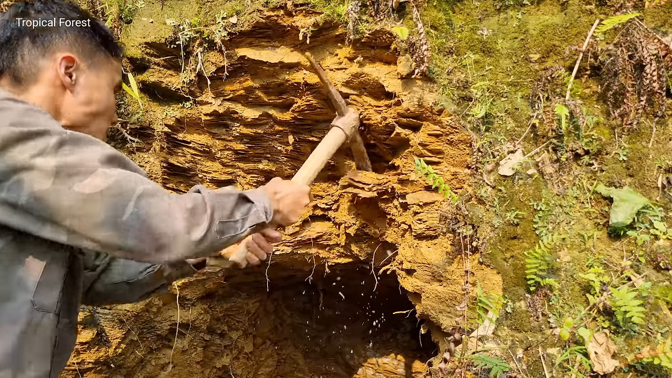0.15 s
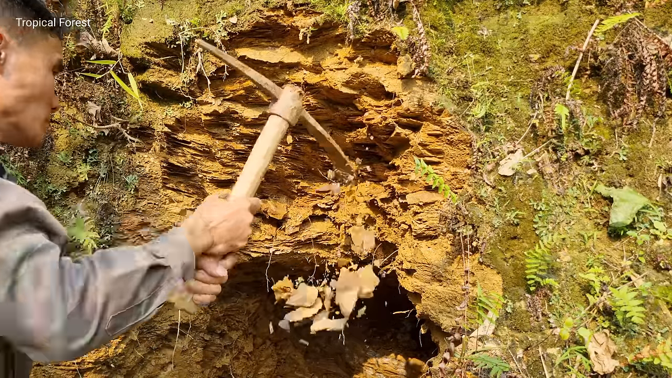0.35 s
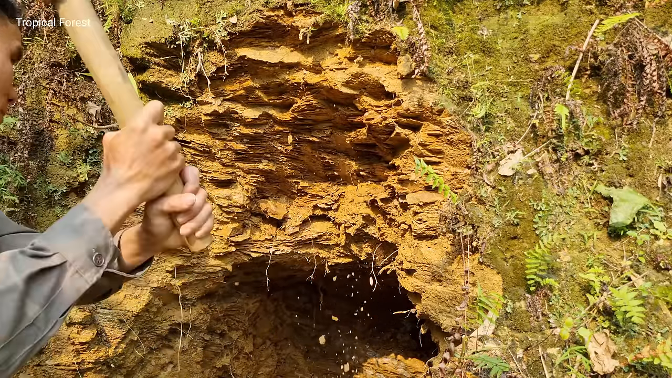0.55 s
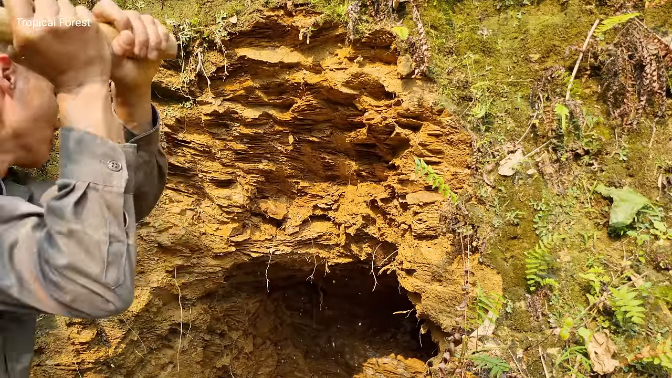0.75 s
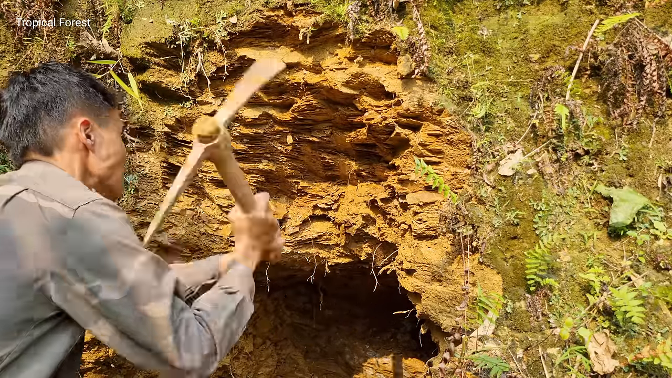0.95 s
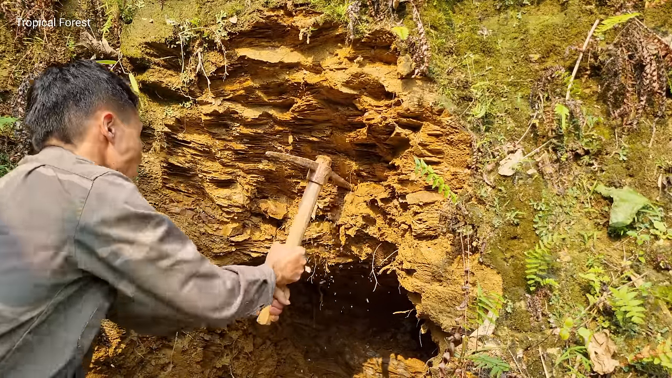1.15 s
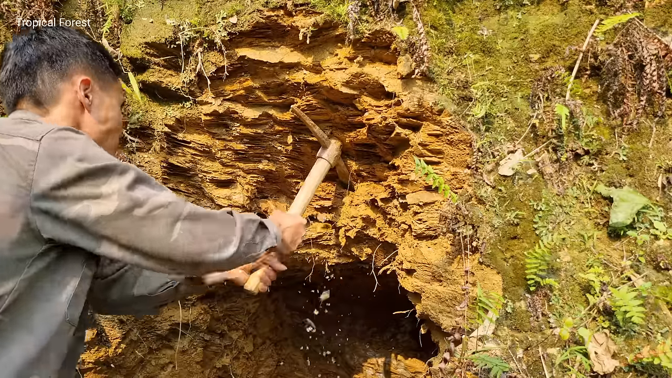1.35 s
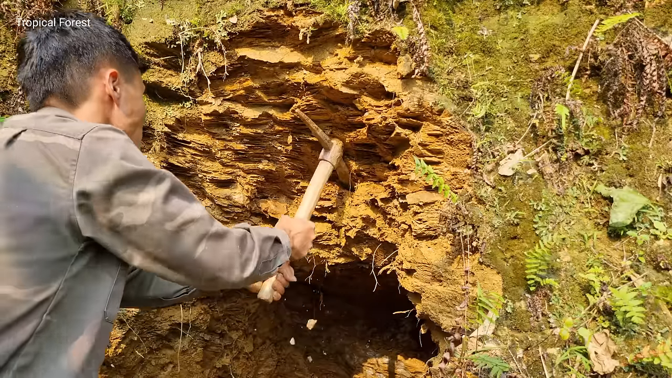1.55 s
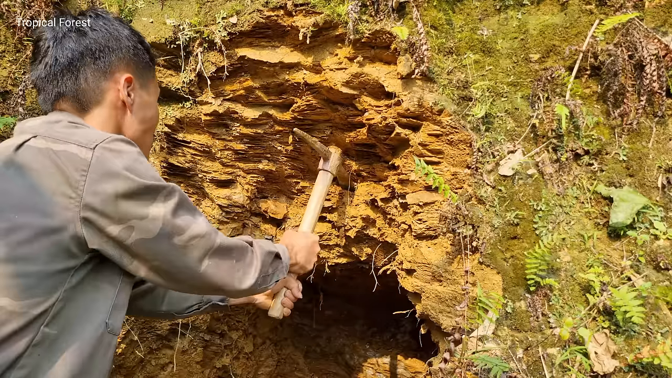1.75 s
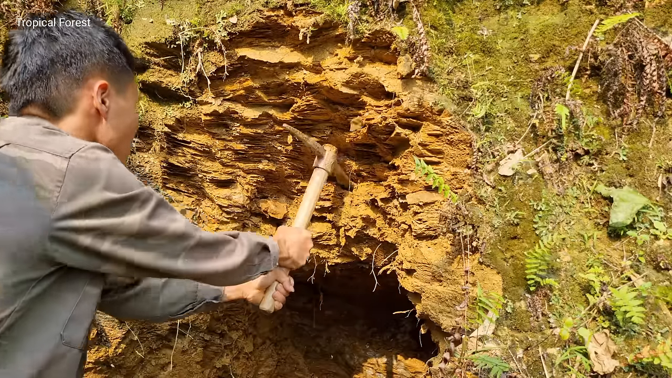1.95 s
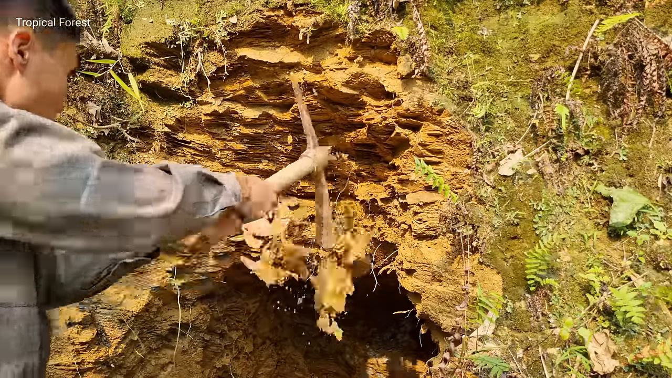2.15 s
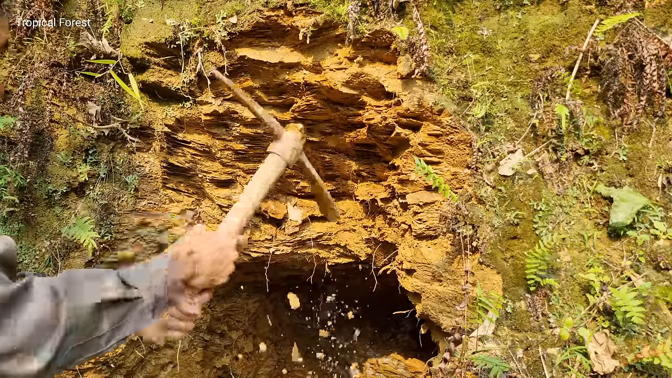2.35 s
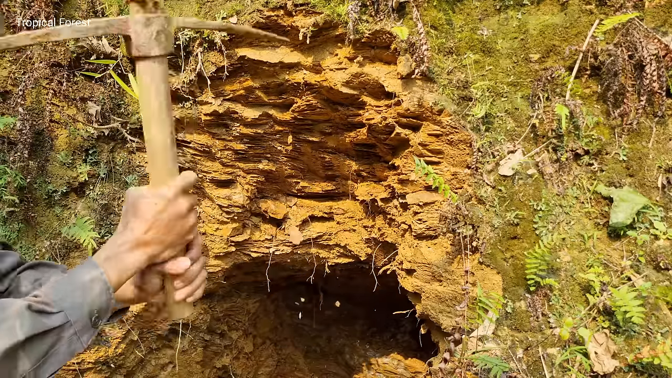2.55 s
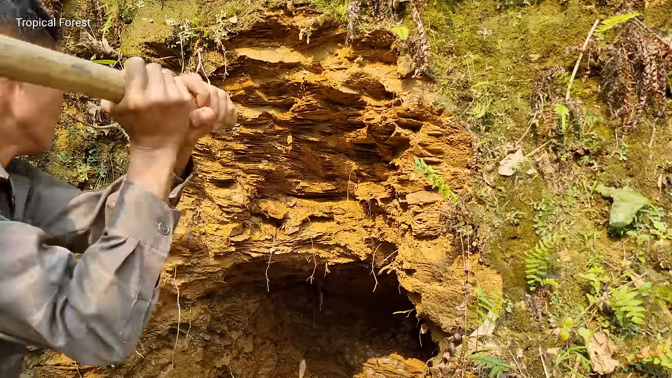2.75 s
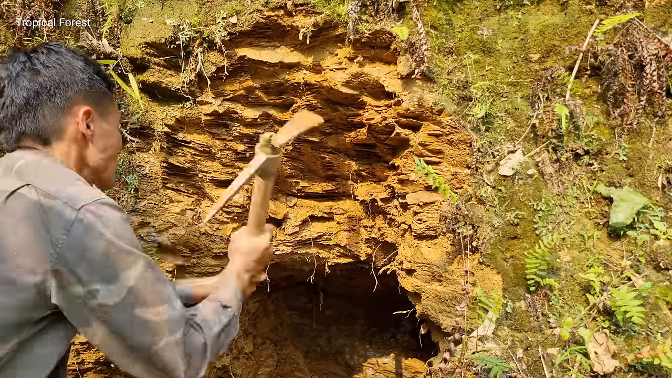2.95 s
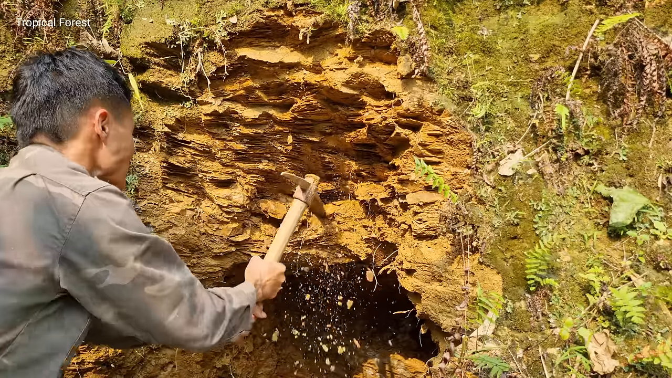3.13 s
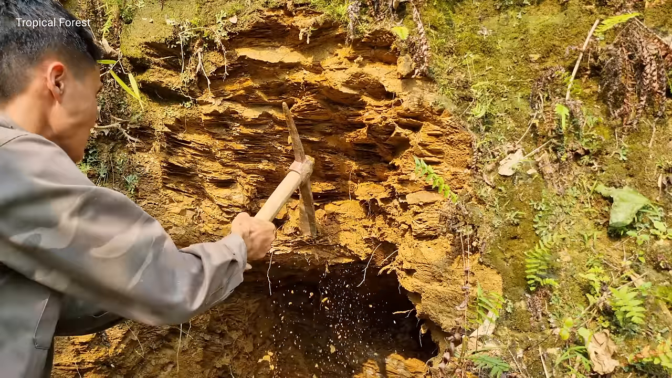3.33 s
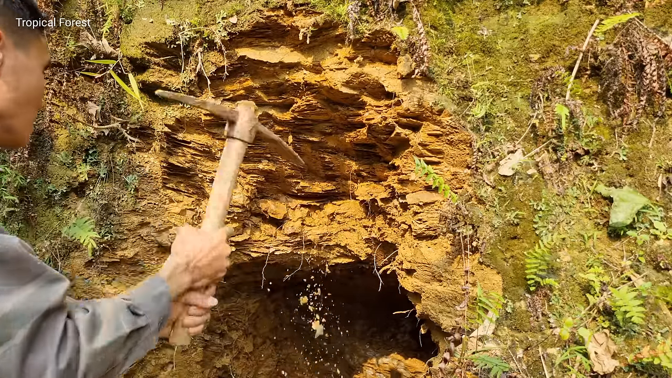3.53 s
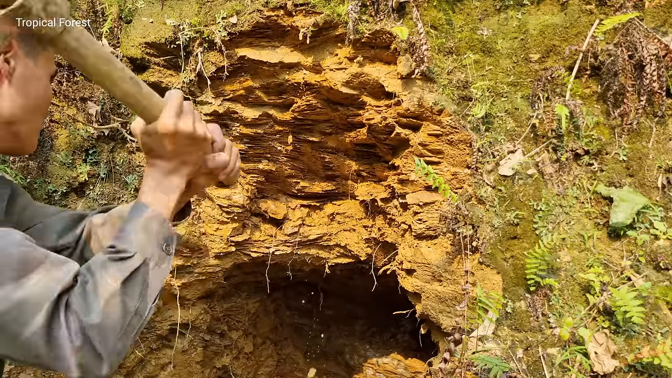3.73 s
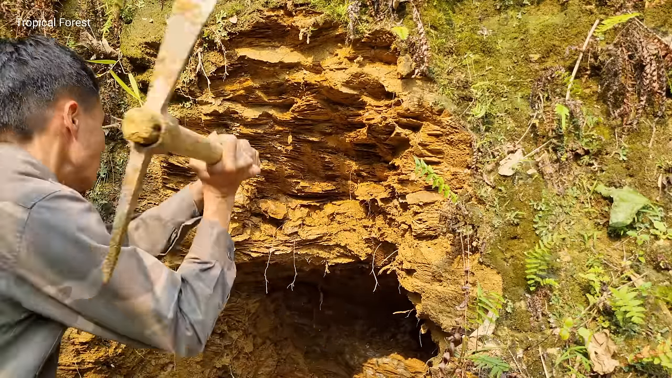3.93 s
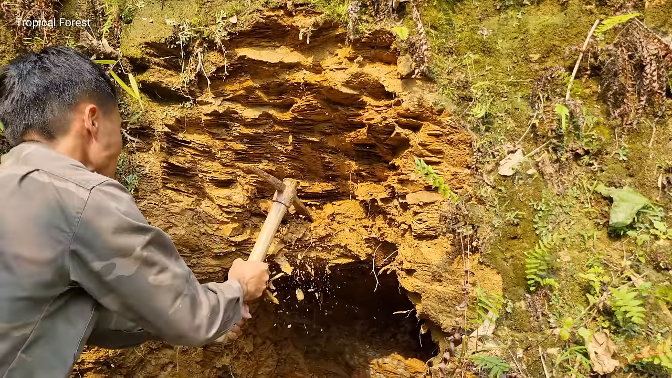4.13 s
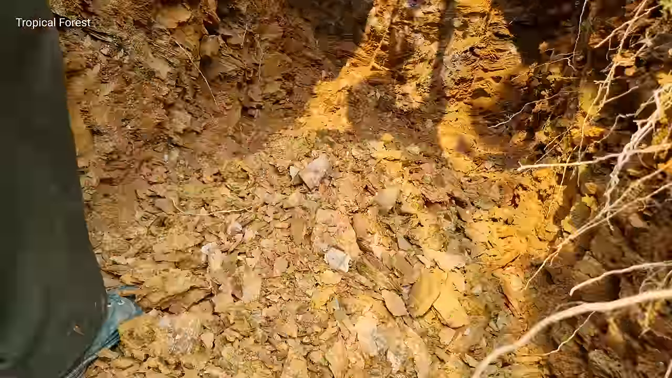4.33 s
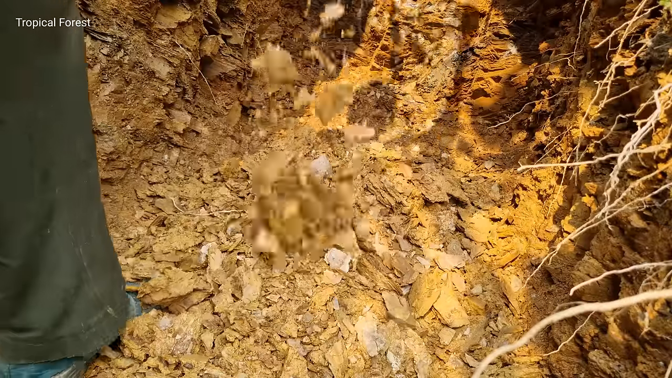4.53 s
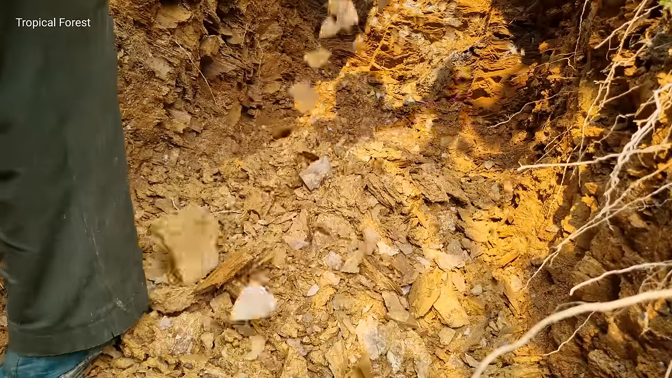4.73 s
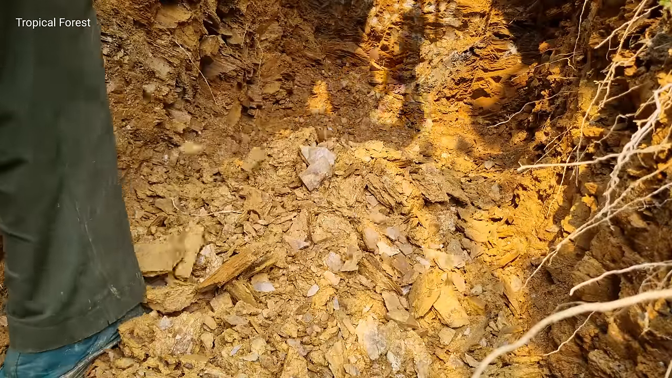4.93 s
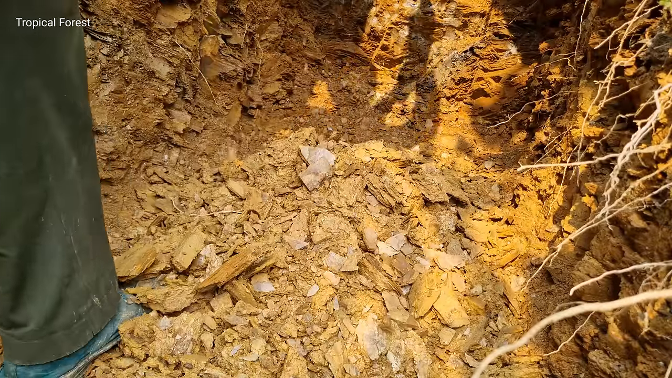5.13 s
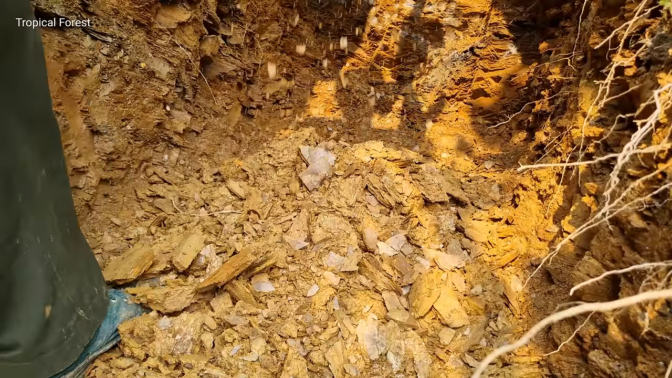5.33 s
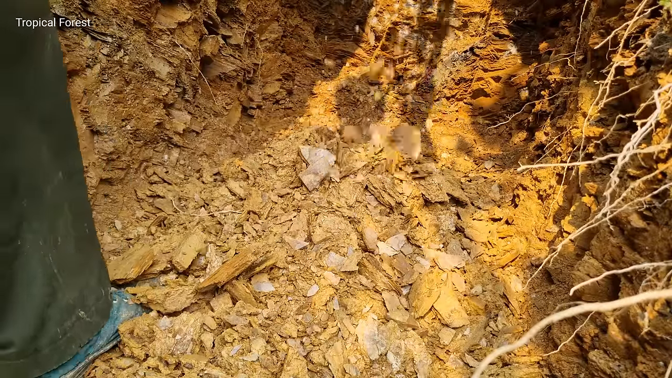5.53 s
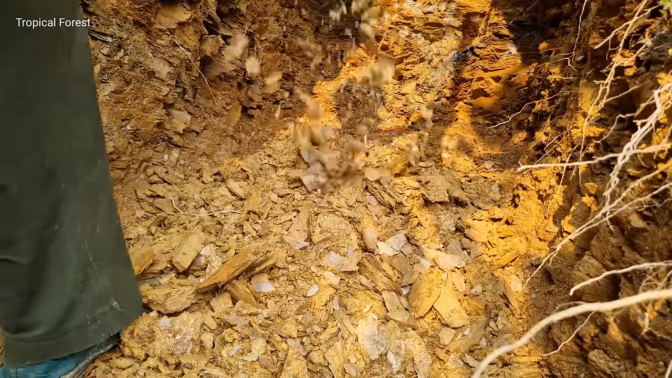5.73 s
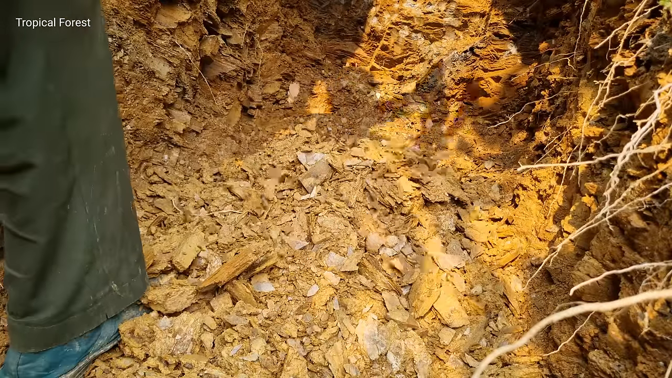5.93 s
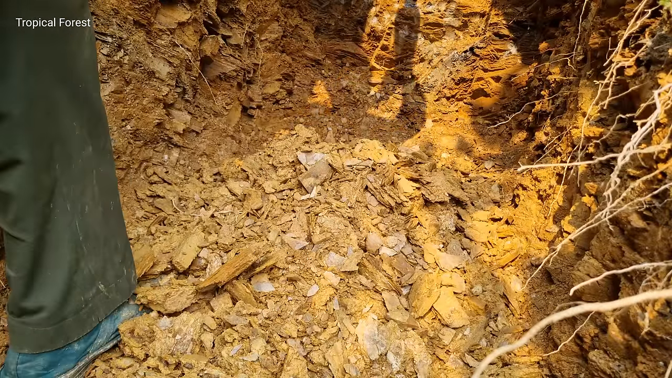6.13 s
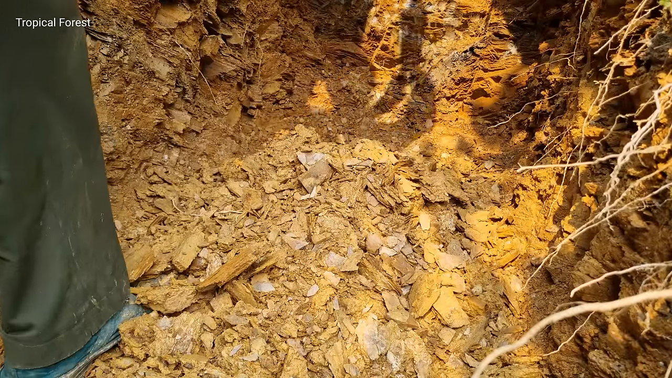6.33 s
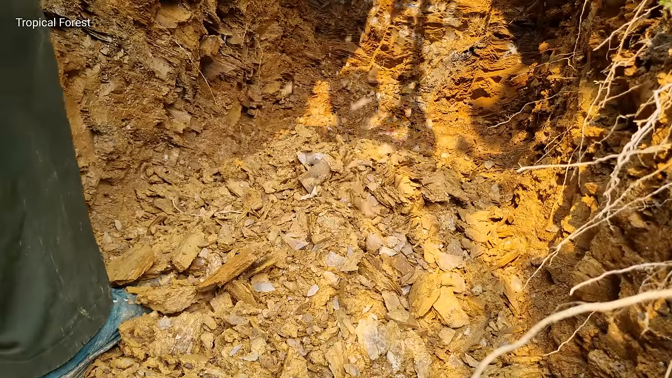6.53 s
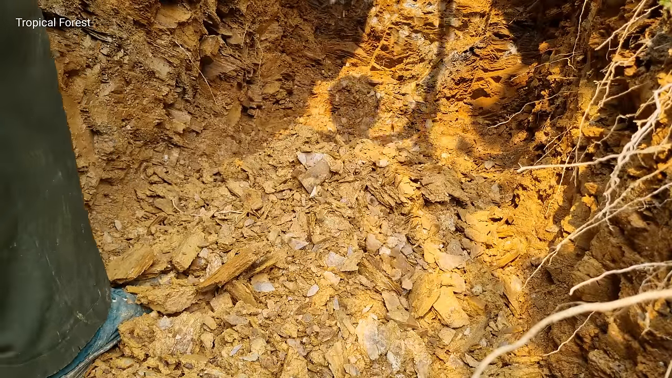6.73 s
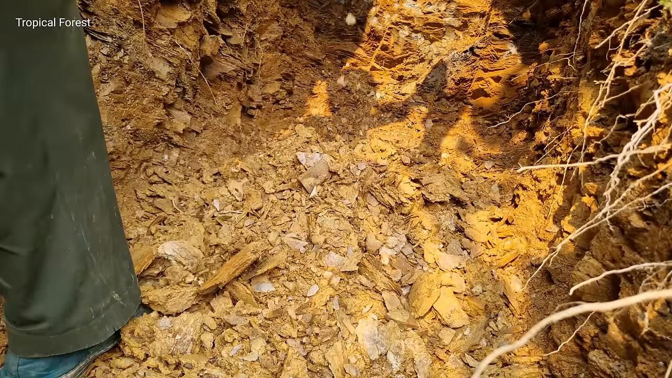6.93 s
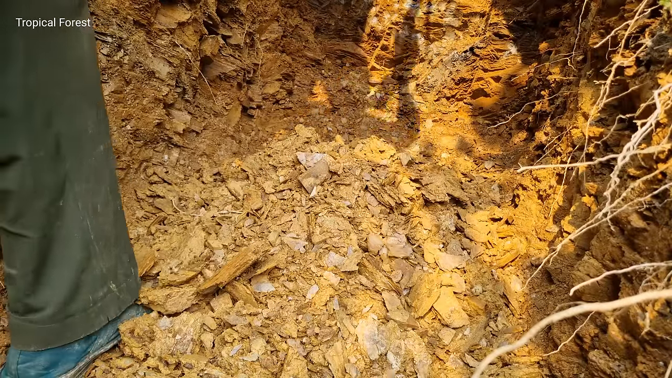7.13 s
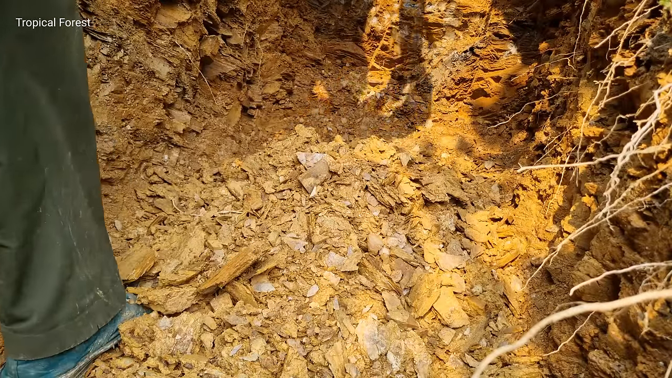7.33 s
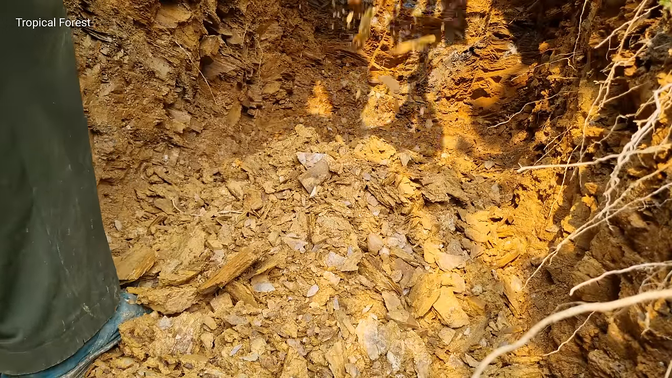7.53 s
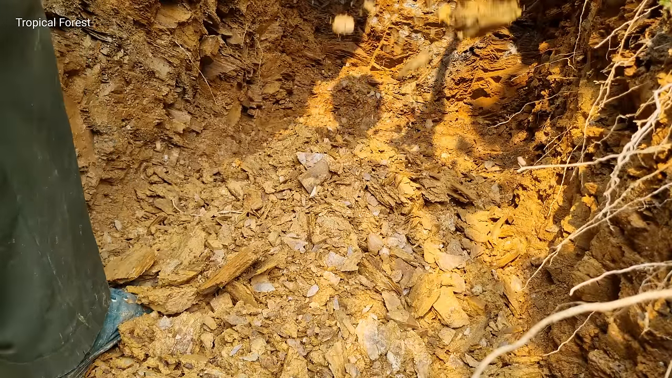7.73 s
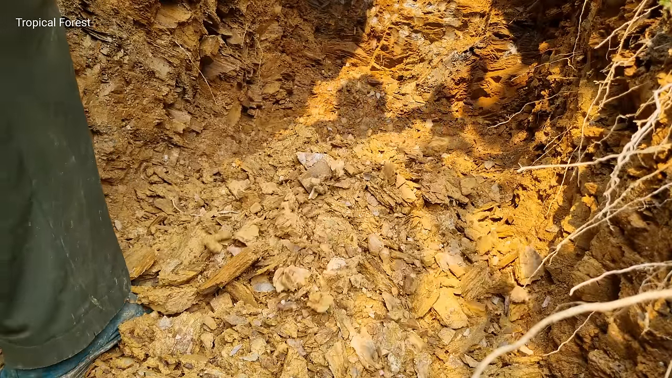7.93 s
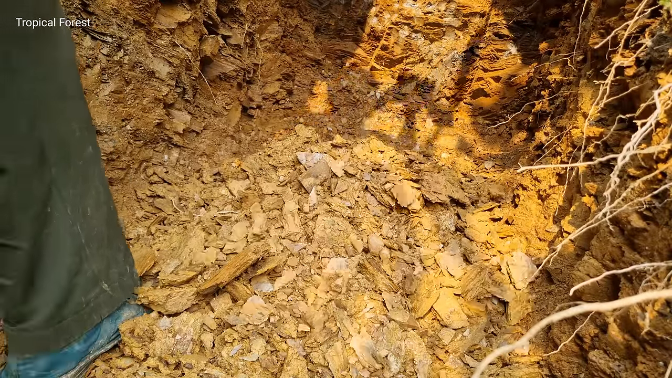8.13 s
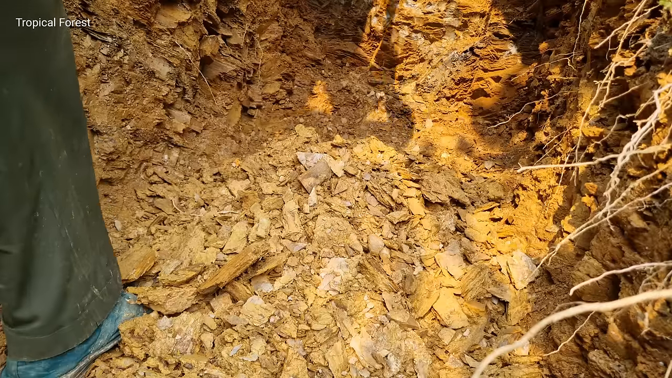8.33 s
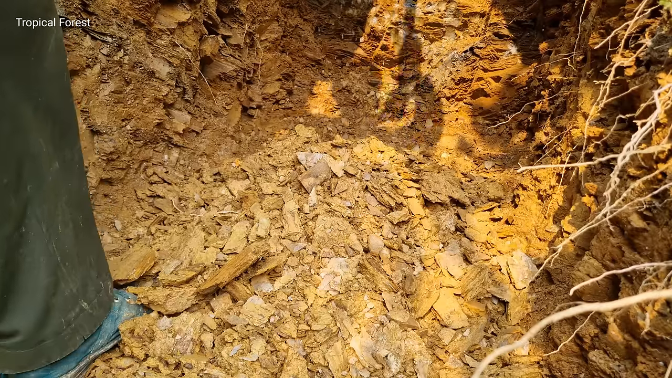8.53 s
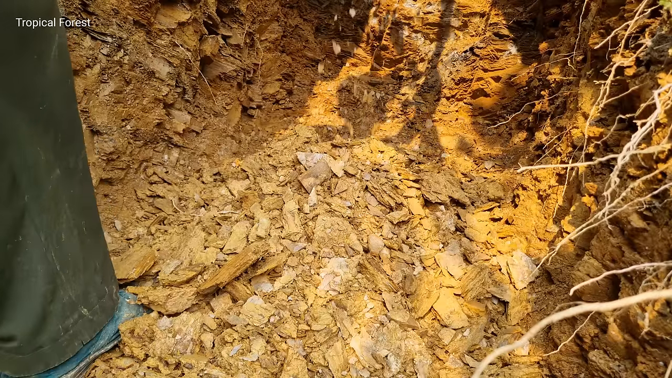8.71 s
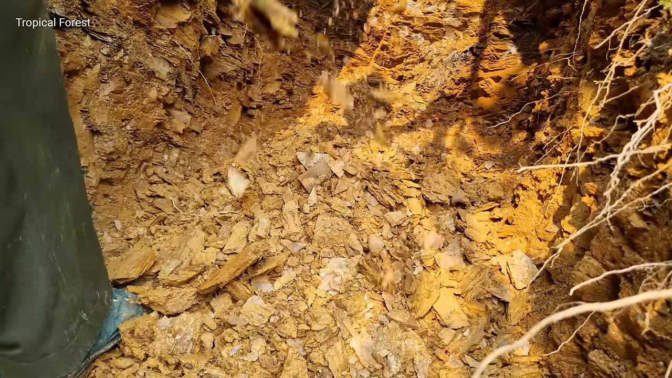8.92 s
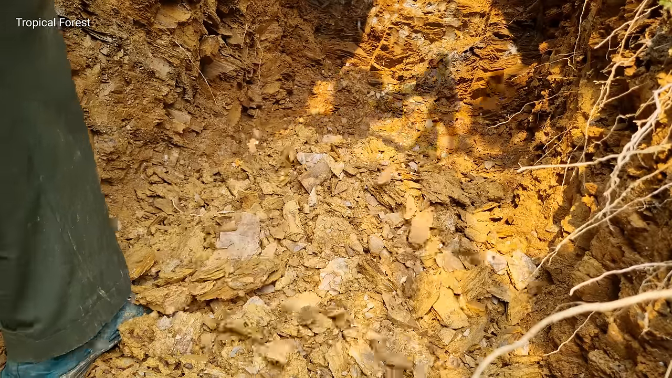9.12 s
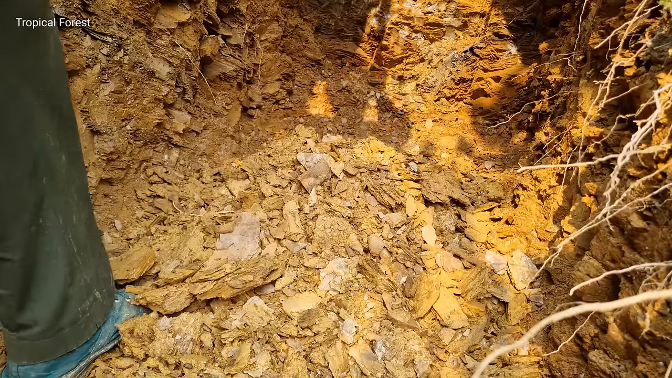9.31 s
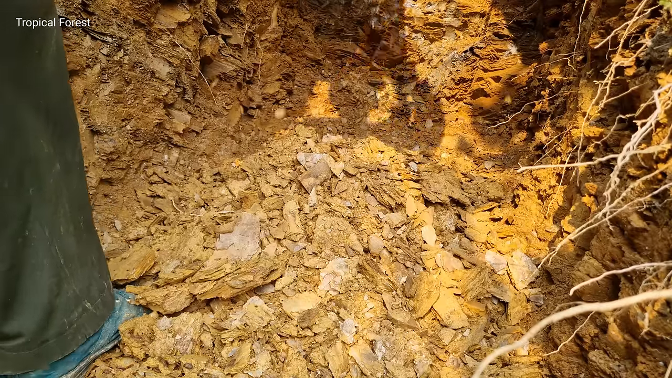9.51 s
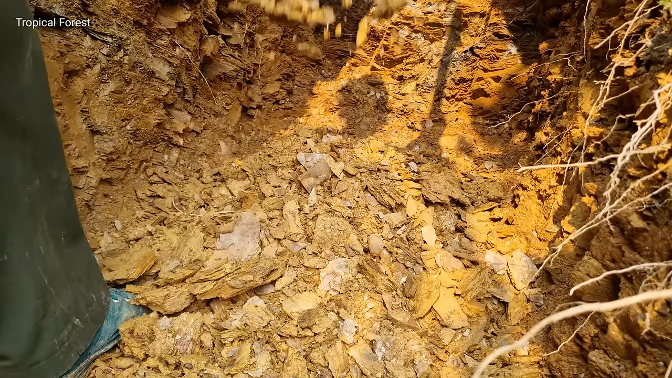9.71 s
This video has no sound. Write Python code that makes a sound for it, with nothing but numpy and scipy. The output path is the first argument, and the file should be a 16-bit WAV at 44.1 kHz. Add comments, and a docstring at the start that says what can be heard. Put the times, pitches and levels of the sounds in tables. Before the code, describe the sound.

Close outdoor stereo sound of digging into layered, crumbly rock, dry and without noticeable echo. At first grit trickles, a small lump drops and the steel pick head sings faintly; at 0.75 a short rush of rubble lands. A crunching blow at 1.1 has a low ground boom. From 1.3 to 2.3 the wedged tool is levered: stone grinds, wood creaks, steel rings thinly and sharp clicks snap around 2.1. Heavy lumps thud down at 2.6. Blows at 3.1 and 4.1 follow, with a faint pry at 3.3 and a big spill of rubble at 4.6. Then strikes come about every 1.1 seconds, at 5.0, 6.2, 7.25, 8.3 and 9.35, some preceded by a tiny scrape. Between them flakes tick, grit showers and stones thump, notably at 5.5 to 5.9, 7.0, 7.9 and 9.1. Grit thins out at the end. Very quiet distant insect hiss and low rumble underneath.

```python
"""Grit trickles and a first small burst of rubble slides while a steel pick head sings faintly against rock.
Then a pickaxe bites into a bank of layered, crumbly rock and is pried loose; flakes and grit pour into the pit.
Rock is shaped noise, grains and short resonances; steel and wooden handle are resonances driven by slipping stone.
Heavy impacts shake the ground, which answers late with a low boom. Insects hiss far off over a low rumble.
A handheld stereo microphone stands close by; its two ports hear the bass more alike than the treble."""
import sys
import numpy as np
from scipy import signal
from scipy.fft import rfft, irfft, next_fast_len
from scipy.io import wavfile
from scipy.ndimage import map_coordinates

SR = 44100
rng = np.random.default_rng(int(sys.argv[2]) if len(sys.argv) > 2 else 0)


def master_out(mix):
    """Clip the mix to full scale and print it as 16-bit PCM to the path in sys.argv[1]."""
    frames = np.transpose(np.atleast_2d(mix))
    ceiling = np.clip(frames, -1, 1)
    pcm = np.round(ceiling * 32767).astype(np.int16)
    wavfile.write(sys.argv[1], SR, pcm)


N = 435266


def amp(db):
    """Decibels to gain."""
    return 10 ** (np.asarray(db) / 20)


def unit(x):
    """Scaled to rms 1."""
    return x / np.sqrt(np.mean(x ** 2) + 1e-20)


def along(points, hz):
    """(Hz, value) points read on a log axis."""
    f, v = np.transpose(points)
    return np.interp(np.log(hz + 1), np.log(f + 1), v)


def filtered(x, response):
    """x times a complex response of frequency, zero-padded so that tails do not wrap onto the start."""
    n = x.shape[-1]
    m = next_fast_len(n + 8192)
    return irfft(rfft(x, m) * response(np.fft.rfftfreq(m, 1 / SR)), m)[..., :n]


def add(track, s, sound):
    """Mix a sound into a track at time s."""
    part = track[..., round(s * SR):][..., :sound.shape[-1]]
    part += sound[..., :part.shape[-1]]


def wobble(rate):
    """A smooth random curve, rate knots a second."""
    knots = rng.standard_normal(int(N * rate / SR) + 4)
    return map_coordinates(knots, [np.arange(N) * rate / SR])


def patter(per_s, spread_db):
    """Sparse impulses of very unequal size and either sign."""
    size = amp(spread_db * np.minimum(rng.exponential(size=N), 3))
    return (rng.random(N) < per_s / SR) * size * rng.standard_normal(N)


def ringer(x, hz, cycles):
    """x through one resonance that dies by 60 dB in the given number of cycles."""
    r = amp(-60 * hz / (cycles * SR))
    return signal.lfilter([1, 0, -1], [1, -2 * r * np.cos(2 * np.pi * hz / SR), r * r], x)


def resonances(modes):
    """Causal response of a set of (Hz, width Hz, dB) modes, alternating in sign."""
    def response(f):
        total = 0
        for k, (centre, width, db) in enumerate(modes):
            band = 1j * f * width / (centre * centre - f * f + 1j * f * width)
            total = total + (-1) ** k * amp(db) * band
        return total
    return response


# likeness of the two microphone ports: (f/Hz, correlation)
PORT_LIKENESS = [(100, 0.62), (500, .8), (1500, 0.3), (5000, 0.05), (12000, 0.075)]


def port_angle(hz):
    """Phase angle whose cosine is the likeness of the two ports."""
    return np.arccos(np.clip(along(PORT_LIKENESS, hz), -1, 1))


def hiss(spectrum, size):
    """Stereo noise of rms 1: much alike at both ports in the bass, nearly unrelated in the treble."""
    def shared_and_opposed(hz):
        turn = port_angle(hz) / 2
        return amp(along(spectrum, hz)) * [np.cos(turn), np.sin(turn)]
    mid, side = filtered(rng.standard_normal((2, size)), shared_and_opposed)
    return unit(np.array([mid + side, mid - side]))


def grains(spectrum, low_hz, high_hz, per_s, spread_db, cycles, count):
    """Pieces of many sizes, each size with its own pitch and place, knocking at random; rms 1."""
    out = np.zeros((2, N))
    for hz in np.geomspace(low_hz, high_hz, count) * amp(rng.normal(0, 0.7, count)):
        piece = unit(ringer(patter(per_s / count, spread_db), hz, cycles))
        piece = piece * amp(along(spectrum, hz)) * np.sqrt(hz)
        lag_s = port_angle(hz) / (2 * np.pi * hz)  # between the ports
        out += [piece, np.roll(piece, round(rng.choice([-1, 1]) * lag_s * SR))]
    return unit(out)


# quiet background: a low rumble, with far insects hissing near 3, 5 and 8 kHz: (f/Hz, level/dB per Hz)
BACKGROUND_SPECTRUM = [(18, -33), (30, -4.5), (58, 4), (118, -21), (273, -11.5), (364, -20.5),
                       (1540, -37.5), (2750, -4), (3770, -11.5), (4780, -7), (6720, -18), (8300, -4),
                       (9220, -25.5), (14800, -15), (16000, -33)]


def quiet_background():
    """A low rumble and the hiss of far insects as one shaped noise, gently wavering in level."""
    level_db = -65.5 + 0.68 * wobble(2.9)
    return amp(level_db) * hiss(BACKGROUND_SPECTRUM, N)


# grit that keeps trickling between the bursts: (t/s, grit level/dB, stones over grit level/dB)
TRICKLING = [(0, -60.5, 1), (.15, -68, -26), (.7, -69.5, -9), (1.05, -66, -1.5), (1.6, -62, -5.5),
             (1.95, -64.5, 15.5), (2.35, -78, -13.5), (2.75, -68, 2.5), (3.4, -61, -5.5), (3.9, -77, 4.5),
             (4.4, -73, 11), (5.0, -50.5, -4), (5.77, -62, -0.5), (6.05, -53, -3.5), (6.92, -81, 6.5),
             (7.24, -56, -3.5), (7.55, -86.5, -20), (8.05, -59, -7.5), (8.35, -69.5, -9.5),
             (9.87, -63.5, 5)]
# bursts of rubble sliding or landing, and of stone grinding under the levered pick:
# (t/s at full flow, build-up/dB per s, held t/s, decay/dB per s, grit level/dB, stones over grit level/dB)
BURSTS = [(0.199, 398, 0.071, 307, -51.5, -2.5), (0.756, 900, 0.048, 301, -36, -4),
          (1.378, 897, 0.04, 404, -56.5, 10.5), (1.85, 897, 0.11, 900, -53.5, 14.5),
          (2.044, 516, 0.018, 299, -47.5, -20.5), (2.114, 502, 0.006, 389.5, -37, 8),
          (2.555, 2494, 0.025, 270, -44, 11), (2.624, 263, 0.068, 429, -40.5, 1.5),
          (3.26, 702, 0.052, 302, -53, 4), (3.335, 302, 0.0076, 337, -41, -17.5),
          (3.559, 200, 0.048, 143, -65, -18), (4.42, 797, 0.0031, 119.5, -52, -22.5),
          (4.569, 1999, 0.0056, 353, -46, 2), (4.632, 803, 0.044, 204.5, -31.5, -8),
          (4.731, 300, 0.042, 330, -44.5, 4), (4.866, 900, 0.062, 247.5, -45, -2.5),
          (5.312, 1500, 0.013, 69, -54, -13), (5.416, 600, 0.0086, 292, -45, -18),
          (5.541, 1500, 0.025, 303.5, -38, -12.5), (5.601, 1000, 0.066, 195.5, -43, -4),
          (5.844, 908, 0.044, 202, -33.5, -13), (6.47, 180, 0.0036, 332, -50.5, -12),
          (6.523, 997.5, .01, 57.5, -52.5, -12.5), (6.627, 500, 0.0073, 92, -49.5, -11),
          (6.972, 509, 0.045, 388.5, -38.5, -11), (7.447, 609, 0.072, 361, -52.5, 2),
          (7.648, 1697, 0.0044, 355, -50.5, 0), (7.709, 300, 0.0049, 187, -42.5, -4.5),
          (7.921, 1505.5, 0.05, 318, -37, -4.5), (8.571, 64, .005, 119, -58.5, -9.5),
          (8.82, 204, 0.023, 165, -53.5, -12), (9, 799.5, 0.05, 303, -43.5, -4),
          (9.105, 508, 0.00344, 409, -27.5, -2), (9.568, 102, 0.0098, 162, -48, -7),
          (9.766, 361, .005, 57, -55, -12)]


def flow():
    """Gains of grit and stones: each burst builds up, holds and dies away over the trickle."""
    t = np.arange(N) / SR
    s, grit_db, over_db = np.transpose(TRICKLING)
    grit = amp(np.interp(t, s, grit_db))
    stones = amp(np.interp(t, s, grit_db + over_db))
    for start, builds, held, dies, db, over_db in BURSTS:
        first = max(round((start - .2) * SR), 0)
        u = t[first:first + SR] - start
        burst = amp(db + builds * np.minimum(u, 0) - dies * np.maximum(u - held, 0))
        add(grit, first / SR, burst)
        add(stones, first / SR, amp(over_db) * burst)
    return grit, stones


# fine grit: (f/Hz, level/dB per Hz)
GRIT_SPECTRUM = [(590, -41), (1000, -1.5), (1430, 0), (6110, -0.5), (7790, 1.5), (9170, -6.5),
                 (14900, -7.5), (16000, -23.5)]
# tumbling and grinding stones: (f/Hz, level/dB per Hz)
STONE_SPECTRUM = [(65, -29), (130, -3), (300, -7), (470, -10), (636, -6.5), (1010, -14.5), (2200, -20.5),
                  (2860, -46.5), (4840, -120)]


def rubble(fine, coarse):
    """Grit rains in clumps of tiny grains over a wash of dust, stones move in fewer, longer knocks."""
    hits = np.abs(patter(per_s=70, spread_db=2))
    clumps = unit(signal.lfilter([1], [1, -amp(-60 / (0.023 * SR))], hits))  # t60 of 23 ms
    dust = (0.59 + 0.38 * clumps) * hiss(GRIT_SPECTRUM, N)
    grit = dust + .5 * grains(GRIT_SPECTRUM, 1100, 11000, per_s=2000, spread_db=2.5, cycles=9, count=26)
    knocks = grains(STONE_SPECTRUM, 120, 1544, per_s=550, spread_db=4.5, cycles=21, count=20)
    stones = 0.4 * hiss(STONE_SPECTRUM, N) + 0.55 * knocks
    return fine * amp(2.7 * wobble(55)) * grit + coarse * amp(2.0 * wobble(30)) * stones


# waves in the ground after a pick blow: (f/Hz, level/dB, t60 t/s, delay t/s, rise t/s)
GROUND_WAVES = [(60.5, 1.5, 0.2, 0.014, 0.0041), (138, -6.5, 0.069, .009, 0.0057)]
SOIL_S = 0.17  # the soil swallows what is left of a boom about this late


def boom(damping=1, pitch=1, soft=1, upper_db=0):
    """The ground's answer: slow waves in the soil arrive late and swell before they die."""
    t = np.arange(SR // 3) / SR
    out = 0
    for k, (hz, db, t60, delay, rise) in enumerate(GROUND_WAVES):
        late = np.maximum(t - delay / soft, 0)
        decay = amp(db + k * upper_db + rng.normal(0, 1) - 60 * damping * late / t60)
        swell = 1 - np.exp(-late / (rise * soft))
        out = out + decay * swell * np.sin(2 * np.pi * pitch * hz * late)
    return out * amp(-20 * (t / SOIL_S) ** 4)


# the heaviest lumps of rock hitting the pit floor: (t/s, boom level/dB, knock level/dB)
LUMPS = [(0.0, -39, -48), (0.18, -40, -43.5), (0.751, -26.5, -39), (.79, -40, -24.5), (1.432, -49, -62),
         (2.114, -30, -41), (2.568, -19, -41), (2.601, -17.5, -24.5), (3.539, -45, -71), (4.64, -16, -31),
         (4.718, -29, -39), (4.772, -29, -35.5), (4.869, -26.5, -42), (5.204, -30.5, -34), (5.56, -33, -47),
         (5.659, -29.5, -35), (5.789, -32, -43.5), (5.851, -28, -44), (5.922, -31, -38), (6.682, -40, -52),
         (6.778, -42.5, -56), (6.996, -26.5, -34), (7.491, -36, -39), (7.706, -30.5, -43),
         (7.942, -17, -28), (8.064, -44, -57), (8.829, -32, -51), (9.019, -28.5, -56), (9.117, -28.5, -41)]
# a loose lump's boom dies faster than a blow's, varies more in pitch, arrives sooner and swells more slowly
LUMP_DAMPING, LUMP_SCATTER, LUMP_SOFT = 1.13, 0.074, 2  # factor, relative pitch spread, factor
LUMP_UPPER_DB = 5  # a lump stirs the upper wave of the ground more than a blow does
TUMBLE_DB, TUMBLES_PER_S = -7, 240  # smaller lumps shake the ground at random


def thuds(fine):
    """Heavy lumps shake the same ground as the blows and give a dull knock of their own."""
    out, t = np.zeros(N), np.arange(SR // 10) / SR
    for s, db, knock_db in LUMPS:
        burst = rng.standard_normal(len(t)) * amp(-60 * t / 0.12)
        knock = ringer(burst, 220 * amp(rng.normal(0, 2.7)), cycles=9.4)
        add(out, s, amp(knock_db) * knock / np.abs(knock).max())
        pitch = rng.normal(1, LUMP_SCATTER)
        add(out, s, amp(db) * boom(LUMP_DAMPING, pitch, LUMP_SOFT, LUMP_UPPER_DB))
    tumbles = fine * (rng.random(N) < TUMBLES_PER_S / SR) * rng.standard_normal(N)
    shaking = signal.fftconvolve(tumbles, boom(LUMP_DAMPING, soft=LUMP_SOFT))[:N]
    return out + amp(TUMBLE_DB) * shaking


# sharp clicks and short knocks: flakes, small stones, a tap of the pick: (t/s, level/dB, f/Hz)
CLICKS = [(0.72, -34.5, 5940), (0.752, -39.5, 1430), (0.794, -24.5, 3270), (0.829, -32.5, 2620),
          (0.954, -41, 5470), (1.314, -45, 5300), (1.587, -38, 4900), (1.74, -38, 6000), (1.848, -37, 2200),
          (1.944, -37, 1950), (1.965, -30.5, 3510), (2.039, -35, 3500), (2.097, -21, 5430),
          (2.115, -19, 2100), (2.129, -27, 2080), (2.145, -23, 3504), (2.245, -38, 2150),
          (2.534, -47.5, 890), (2.554, -28, 3040), (2.611, -26.5, 4240), (2.635, -33.5, 990),
          (2.655, -37, 1040), (2.669, -36, 1280), (2.69, -31, 3220), (2.776, -48, 1090),
          (3.058, -37.5, 4200), (3.26, -38, 1660), (3.299, -46.5, 4700), (3.342, -26, 4960),
          (3.464, -45, 7500), (3.873, -37.5, 4700), (3.9, -43.5, 3400), (4.317, -50, 900),
          (4.422, -37.5, 8140), (4.482, -38, 5400), (4.567, -30.5, 1620), (4.627, -33, 1500),
          (4.657, -23, 5995), (4.676, -25.5, 6100), (4.866, -40.5, 905), (4.9, -28.5, 6150),
          (4.924, -21, 4300), (4.953, -25, 4200), (5.022, -21, 2490), (5.262, -32.5, 4920),
          (5.311, -46, 1410), (5.45, -40, 3490), (5.477, -38.5, 5960), (5.542, -32, 4770),
          (5.568, -38.5, 1290), (5.599, -30.5, 5100), (5.657, -38, 3315), (5.782, -27.5, 3695),
          (5.829, -20.5, 4460), (5.861, -37, 1480), (5.933, -39, 1870), (6.351, -21.5, 3900),
          (6.525, -27.5, 7740), (6.629, -26.5, 6460), (6.988, -29, 4020), (7.707, -30, 3000),
          (7.921, -48, 700), (7.943, -35.5, 2830), (7.962, -30, 5360), (8.484, -44.5, 4700),
          (8.72, -44.5, 5130), (8.856, -36, 2900), (8.984, -41.5, 6820), (9.003, -27.5, 7140),
          (9.058, -23.5, 4930), (9.103, -15, 2900), (9.61, -29.5, 3960), (9.761, -40.5, 4660),
          (9.797, -34.5, 3770)]


def clicks_and_knocks():
    """Each is a hard click and a short tick of noise around its own pitch, then one weaker tick."""
    out, t = np.zeros((2, N)), np.arange(SR // 20) / SR
    late = np.maximum(t - .0004, 0)
    for s, db, hz in CLICKS:
        noise = hiss([(hz / 8, -26), (hz / 1.8, -5), (hz, 0), (hz * 2.2, -8), (hz * 6, -24)], len(t))
        decay = amp(-60 * t / 0.008) + amp(-11 - 60 * t / 0.045)
        tick = noise * decay * (1 - np.exp(-t / 0.0003))
        cycles = min(5 + (3600 / hz) ** 4, hz / 50)  # low knocks ring on; high ones only click
        click = 1.97 * amp(-60 * late * hz / cycles) * np.sin(2 * np.pi * hz * late)
        lean_db = rng.normal(0, 0.87) * np.array([[1], [-1]])  # to one port or the other
        add(out, s, amp(db + lean_db) * (tick + click))
        # the weaker tick has its ports swapped
        add(out, s + rng.uniform(0.0042, .014), amp(db - 11) * tick[::-1])
    return out


# resonances of the wooden handle: (f/Hz, width f/Hz, level/dB)
HANDLE_MODES = [(257, 78, -2.5), (634, 80, 2), (1070, 100, -6.5), (1790, 380, -11)]


def handle(grinding):
    """Stone slips against the wedged head in fits and the wood of the handle creaks in its own bands."""
    slips = unit(patter(per_s=1400, spread_db=3.5)) * amp(3.5 * wobble(40))
    creak = unit(filtered(slips, resonances(HANDLE_MODES)))
    return amp(1) * grinding * creak  # +1 dB


# resonances of the steel pick head when undamped: (f/Hz, width f/Hz, level/dB)
STEEL_MODES = [(1740, 50, 0.5), (2460, 13, -2.5), (3037, 24, -5.5), (3730, 22, -7.5), (4120, 50, -8),
               (5080, 92, -5), (6400, 13, -4.5), (7370, 27, -3.5), (7520, 79, -9), (9150, 11, -12.5),
               (10100, 25, -8)]
# the head is levered in the crack: (from t/s, to t/s, ring level/dB, damping by the rock as a factor on widths)
LEVERING = [(0.18, 0.494, 18, 2.2), (1.777, 2.302, 22.5, 2.5), (3.283, 3.379, 18.5, 2.3)]


def steel(rubbing):
    """The head slips against the rock in fits; as the contact wanders, its modes sound by turns."""
    out = np.zeros(N)
    for hz, width, level_db in STEEL_MODES:
        slips = rubbing * amp(3.5 * wobble(28)) * unit(patter(per_s=2500, spread_db=3))
        for start, end, db, damping in LEVERING:
            span = slice(round(start * SR), round(end * SR))
            drive = np.pad(slips[span], (0, SR // 4))  # room to ring out
            mode = (hz * rng.normal(1, 0.0096), width * damping, level_db)
            ring = filtered(drive, resonances([mode]))
            add(out, start, amp(db) * ring / np.sqrt(damping))
    return out


# rock crushed under the point: (f/Hz, level/dB per Hz)
CRUNCH_SPECTRUM = [(210, -14), (350, -7.5), (566, -7.5), (943, -9.5), (2070, -6), (2980, -11.5),
                   (4040, -12), (13600, -28), (16000, -37)]
# the point grazes the face just before it bites: (from t/s, to t/s, level/dB)
FACE_GRAZES = [(6.148, 6.172, -26.5), (7.244, 7.252, -31.5), (9.339, 9.347, -22.5)]


def grazes():
    """The point scrapes the face: crushing noise that swells towards the bite."""
    out = np.zeros((2, N))
    for start, end, db in FACE_GRAZES:
        size = round((end - start) * SR)
        onset = np.minimum(np.arange(size) / (0.0033 * SR), 1)
        swell = amp(np.linspace(-9, 3, size))
        add(out, start, amp(db) * onset * swell * hiss(CRUNCH_SPECTRUM, size))
    return out


# ringing layers of the rock face: (f/Hz, level/dB)
ROCK_LAYERS = [(205, -0.5), (270, -2.5), (410, -6), (765, -3.5), (1200, -0.5), (1740, 0.5), (2020, -4.5),
               (2950, -2.5)]
# pick blows close to the microphone: (t/s, crunch level/dB, boom level/dB, extra treble level/dB, crunch t60 t/s,
# ring level/dB, extra low knock level/dB, thick slab f/Hz, thin chip f/Hz)
PICK_BLOWS = [(1.121, -16, -10.5, 5, .063, -22, 6, 629, 1745),
              (3.107, -19, -13, 8.5, 0.1, -20.5, 5.5, 651, 1430),
              (4.137, -16, -13.5, 0, 0.12, -21, 3, 745, 2980),
              (5.0314, -12.5, -15.5, 3, .077, -18, -9, 405.7, 1966),
              (6.172, -12.5, -16.5, 4, 0.067, -20, 2.5, 481, 2212),
              (7.252, -11, -16, -2.5, 0.05, -24.5, -5, 495.5, 1112),
              (8.321, -16.5, -12, -1.5, .067, -22, -1.5, 563, 1827),
              (9.3499, -16.5, -11, 4, 0.054, -22.5, -0.5, 494, 1582)]
KNOCK_HZ = 324  # the low knock lies below
SLAB_DB, CHIP_DB, SCATTER_DB = 5, 9, 1.5  # slab and chip over the ring; chance per mode


def blows():
    """The point crushes rock in a burst of cracks; the struck layers ring briefly and the ground follows."""
    out, t = np.zeros((2, N)), np.arange(SR // 4) / SR
    for s, db, boom_db, bright_db, t60, ring_db, knock_db, slab_hz, chip_hz in PICK_BLOWS:
        tilt = lambda hz: amp(bright_db * np.clip(np.log2(hz / 2000 + 1e-3), 0, 1))
        crush = amp(-60 * t / t60) + amp(-29.5 - 60 * t / 0.32)  # pit walls and dust prolong the burst
        cracks = 1 + t / 0.0059 * np.exp(1 - t / 0.0007)  # the first fracture is the loudest
        onset = 1 - np.exp(-t / 0.00018)
        crunch = filtered(hiss(CRUNCH_SPECTRUM, len(t)), tilt)
        add(out, s, amp(db) * crush * cracks * onset * crunch)
        slab_db = SLAB_DB - knock_db / 2  # a blow that knocks less deep puts more into the slab
        for hz, level_db in ROCK_LAYERS + [(slab_hz, slab_db), (chip_hz, CHIP_DB)]:
            push_s = 0.0012 + 1.5 / hz  # low layers are driven longer and later than small chips
            push = rng.standard_normal(len(t)) * t / push_s * np.exp(-t / push_s)
            ring = ringer(push, hz, cycles=0.84 * np.sqrt(hz))
            low_knock_db = knock_db / (1 + (hz / KNOCK_HZ) ** 8)
            level_db += ring_db + low_knock_db + rng.normal(0, SCATTER_DB)
            add(out, s, amp(level_db) * ring / np.abs(ring).max())
        add(out, s, amp(boom_db) * boom())
    return out


WEDGED_FROM_S, WEDGED_TO_S = 1.3, 2.3  # the head sits fast in a crack and the handle is rocked
CREAK_SHARE = 0.61  # share of the stones' grinding heard through the handle meanwhile


def scene():
    """All sources at the microphone; the flow of rubble also drives tumbling lumps, steel and handle."""
    fine, coarse = flow()
    t = np.arange(N) / SR
    creak = CREAK_SHARE * (t > WEDGED_FROM_S) * (t < WEDGED_TO_S)
    bed = quiet_background() + rubble(fine, (1 - creak) * coarse)
    impacts = thuds(fine) + clicks_and_knocks()
    tool = handle(creak * coarse) + steel(fine)
    return bed + impacts + tool + grazes() + blows()


# colour of the microphone's ports: (f/Hz, left over right level/dB)
PORT_COLOUR = [(100, 1.7), (2000, 2.5), (4500, 0.5), (8500, -5), (13000, -1)]
LOW_CUT_HZ, TOP_HZ = 38, 16000


def record(dry):
    """Ports differ in colour, deepest bass rolls off, peaks are rounded, nothing passes above the band limit."""
    def port_response(hz):
        low_cut = (1j * hz) ** 2 / (LOW_CUT_HZ ** 2 - hz ** 2 + 1.2j * LOW_CUT_HZ * hz)
        return low_cut * amp(along(PORT_COLOUR, hz) * [[.5], [-.5]])
    x = filtered(dry, port_response)
    x = x / (1 + np.abs(x / .95) ** 6) ** (1 / 6)
    return filtered(x, lambda hz: hz < TOP_HZ)


dry = scene()
out = record(dry)
master_out(out)
```